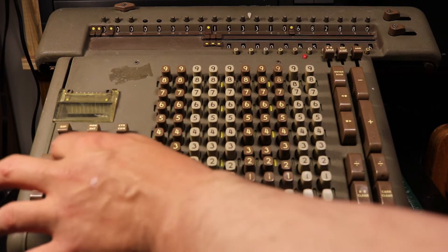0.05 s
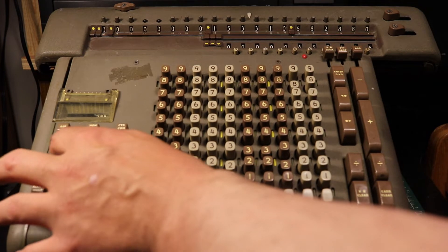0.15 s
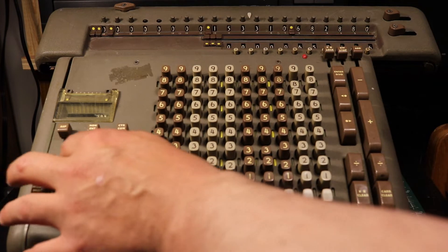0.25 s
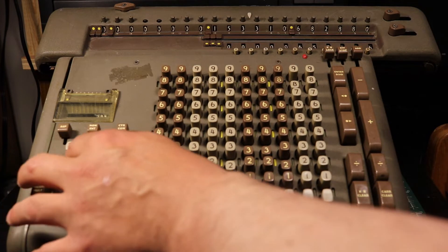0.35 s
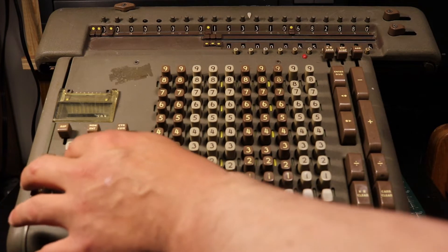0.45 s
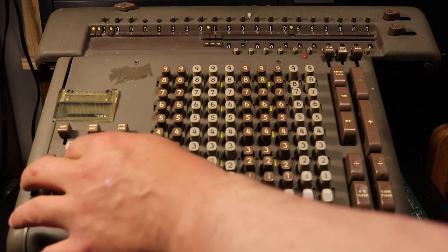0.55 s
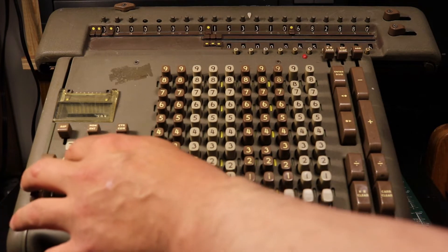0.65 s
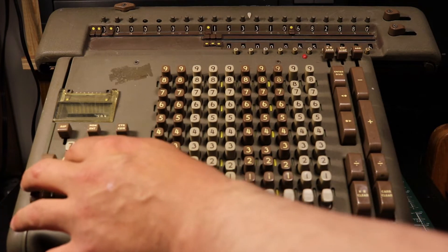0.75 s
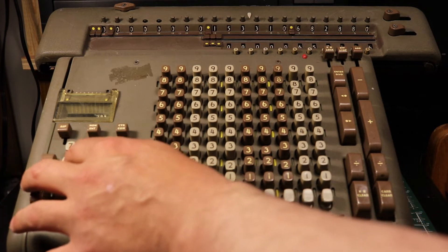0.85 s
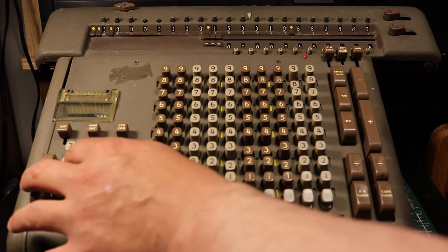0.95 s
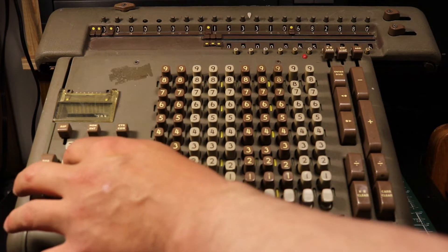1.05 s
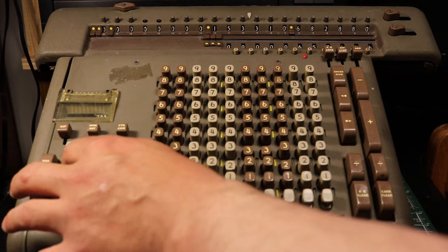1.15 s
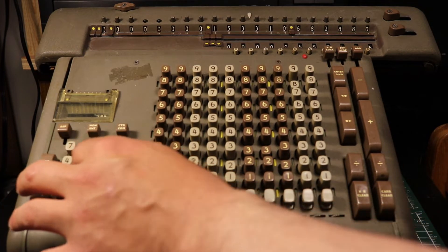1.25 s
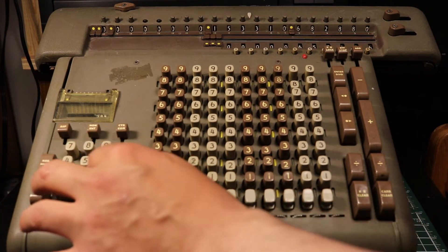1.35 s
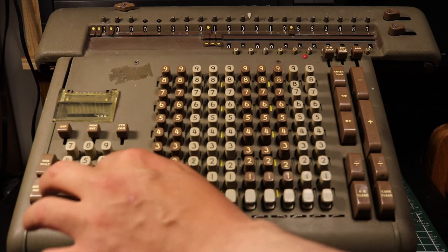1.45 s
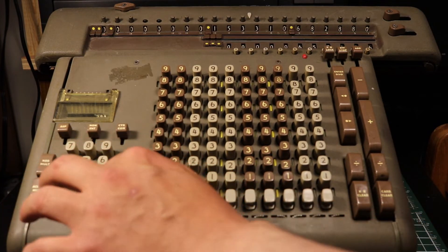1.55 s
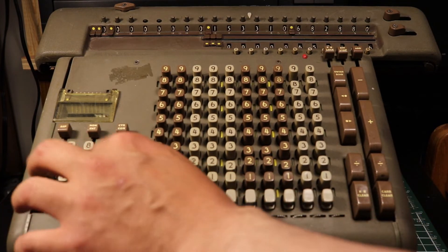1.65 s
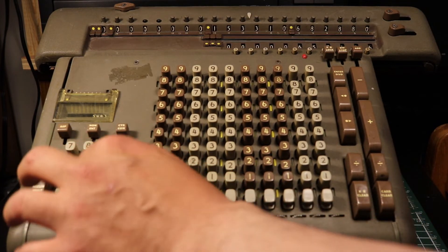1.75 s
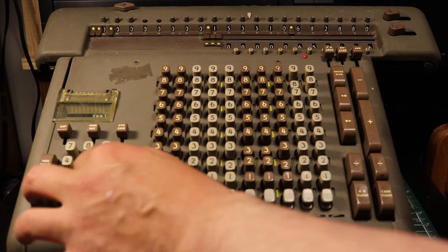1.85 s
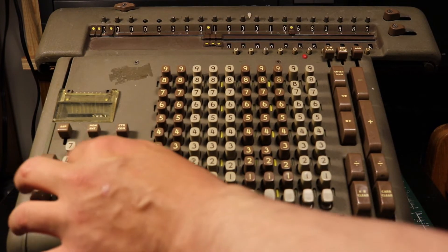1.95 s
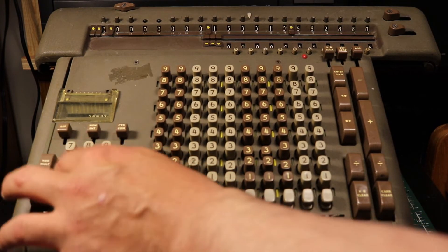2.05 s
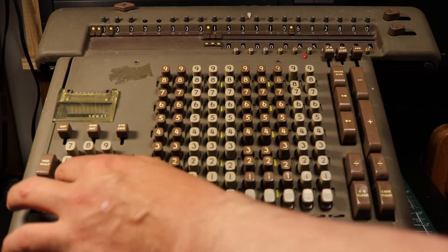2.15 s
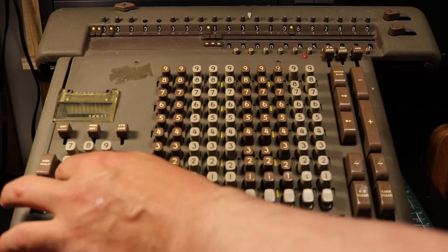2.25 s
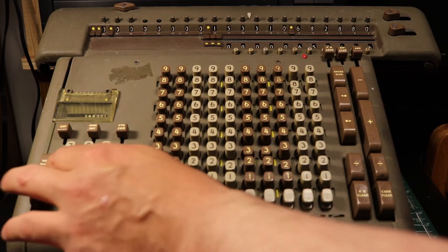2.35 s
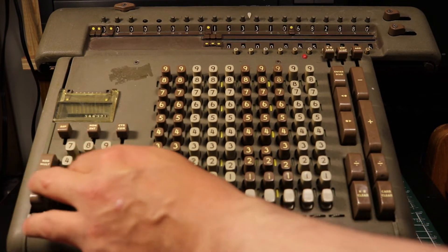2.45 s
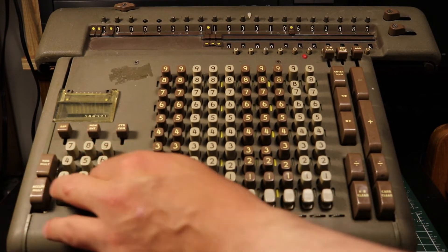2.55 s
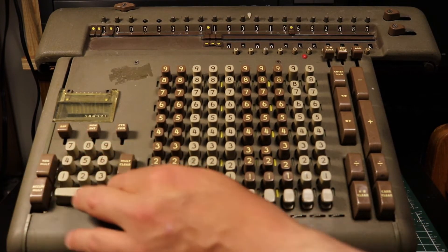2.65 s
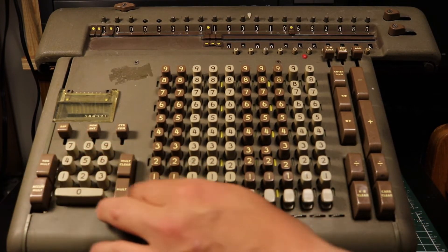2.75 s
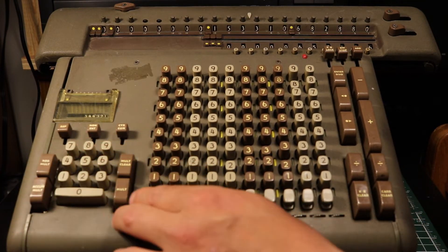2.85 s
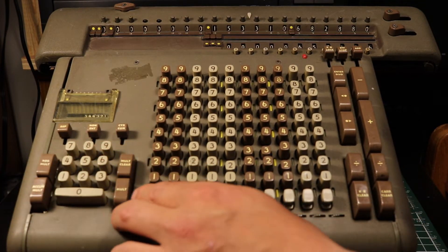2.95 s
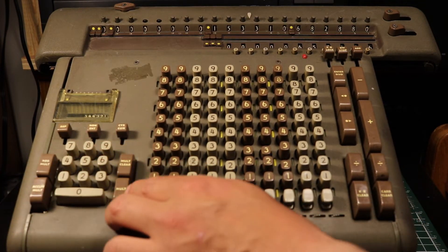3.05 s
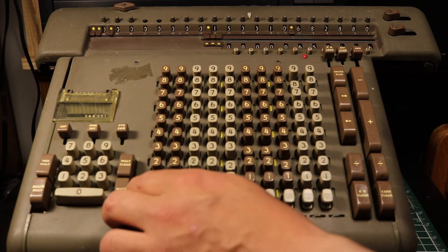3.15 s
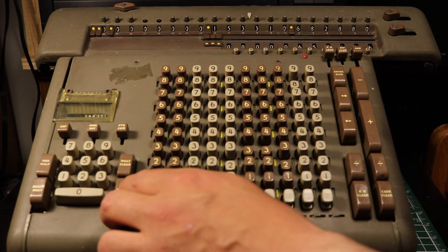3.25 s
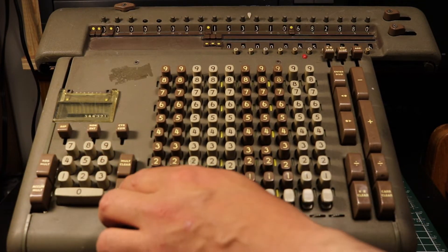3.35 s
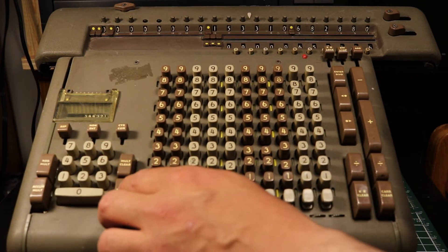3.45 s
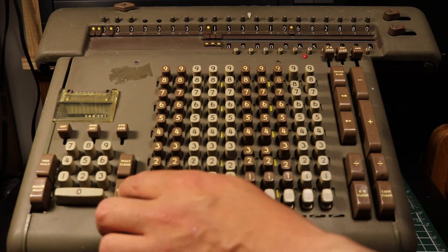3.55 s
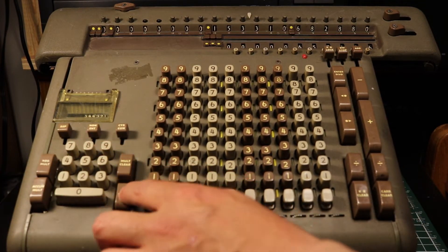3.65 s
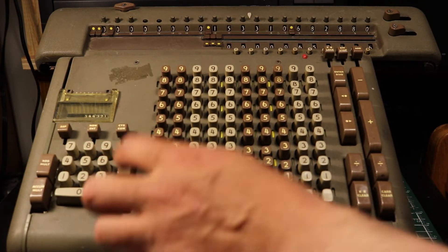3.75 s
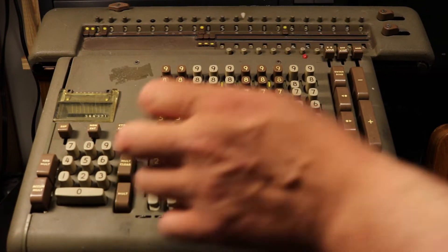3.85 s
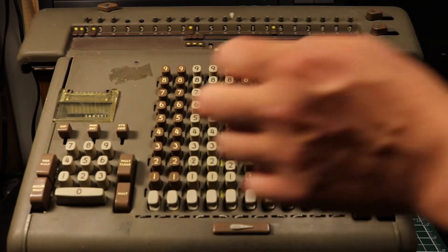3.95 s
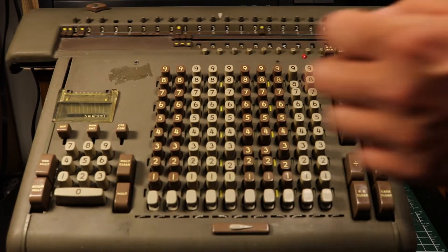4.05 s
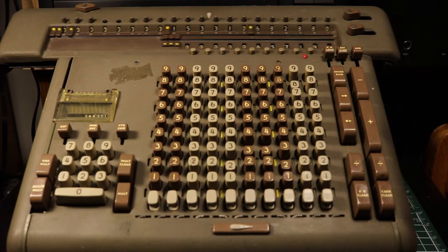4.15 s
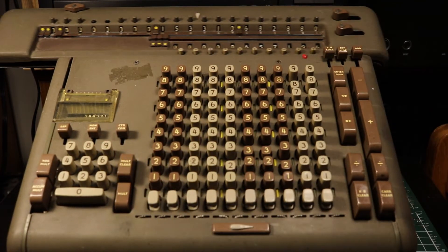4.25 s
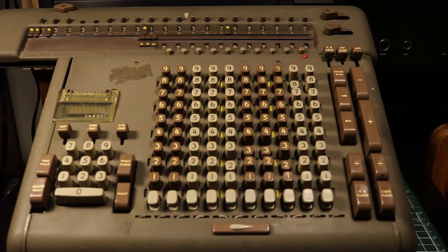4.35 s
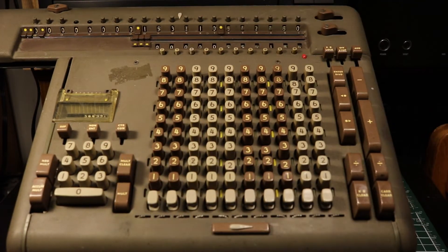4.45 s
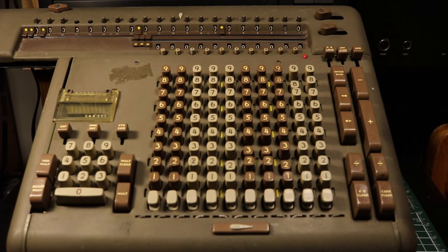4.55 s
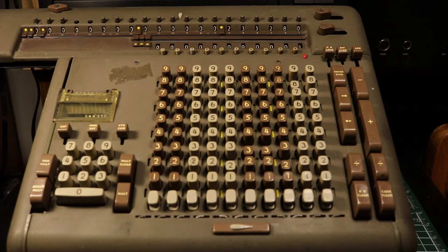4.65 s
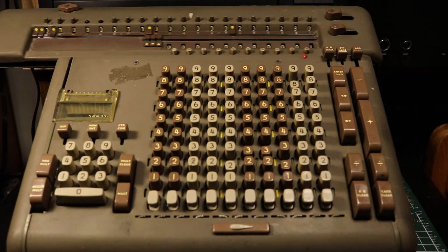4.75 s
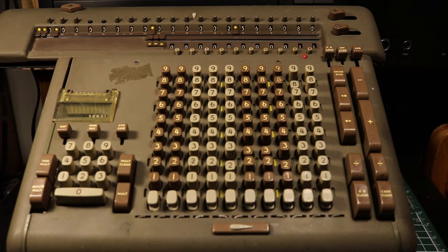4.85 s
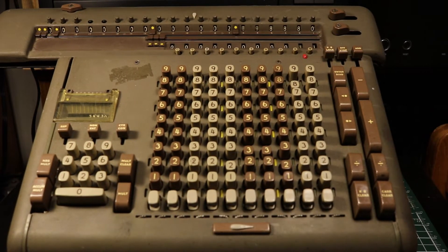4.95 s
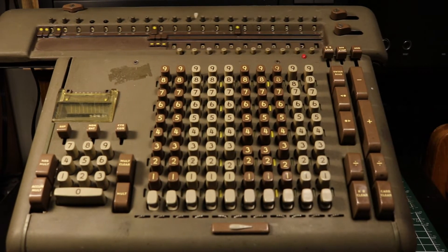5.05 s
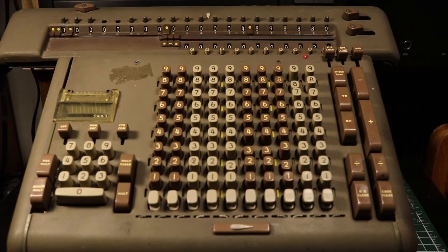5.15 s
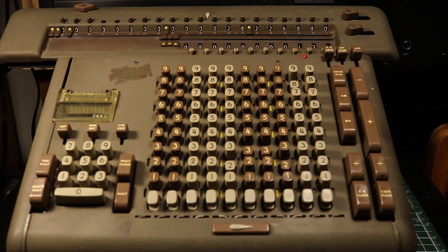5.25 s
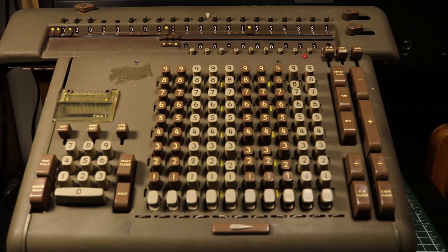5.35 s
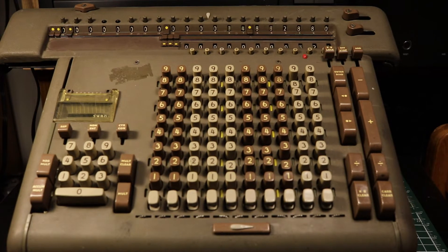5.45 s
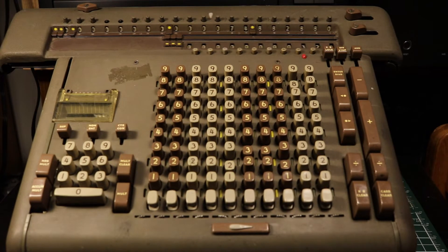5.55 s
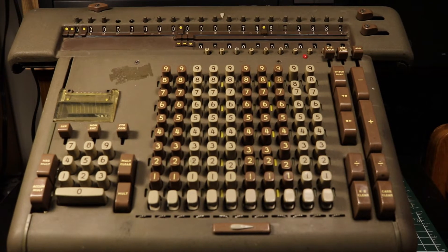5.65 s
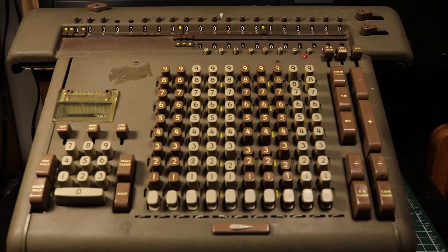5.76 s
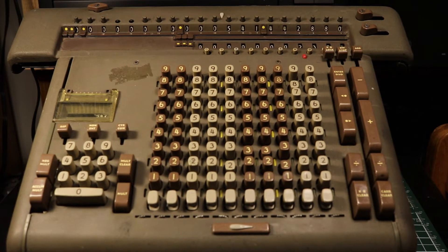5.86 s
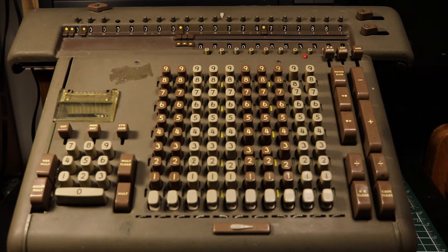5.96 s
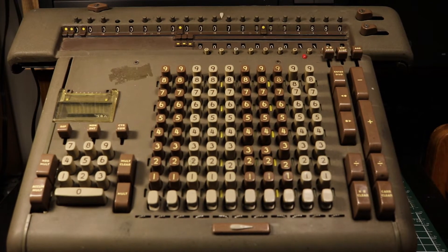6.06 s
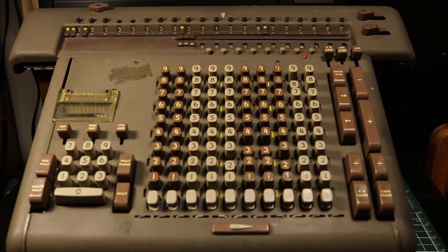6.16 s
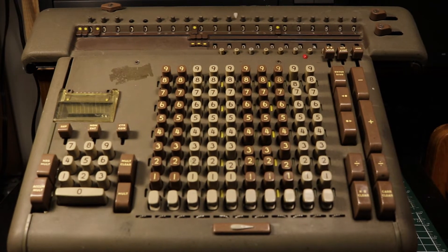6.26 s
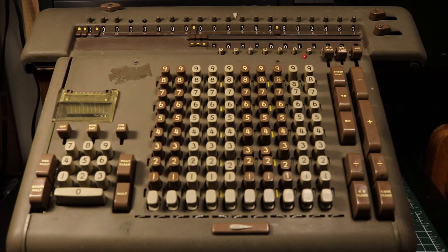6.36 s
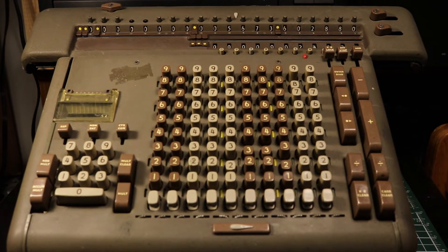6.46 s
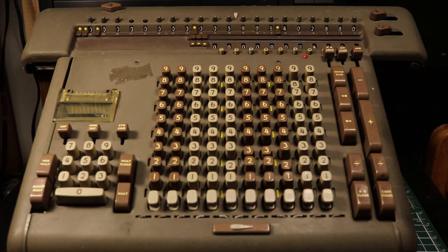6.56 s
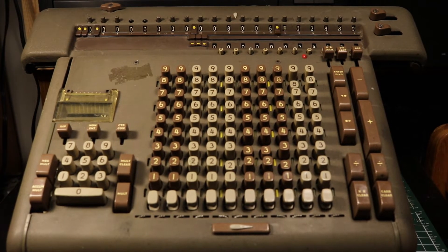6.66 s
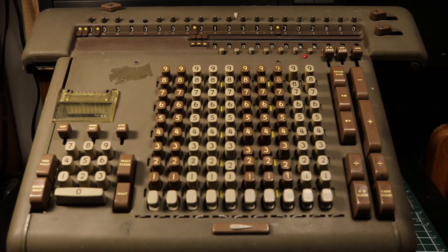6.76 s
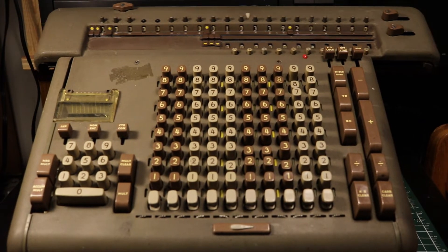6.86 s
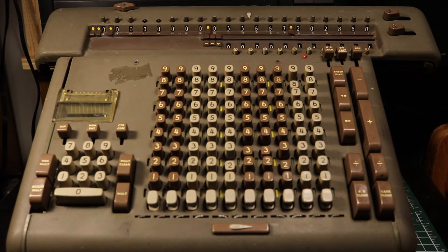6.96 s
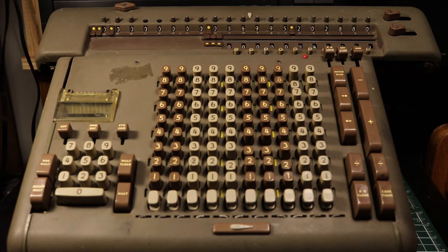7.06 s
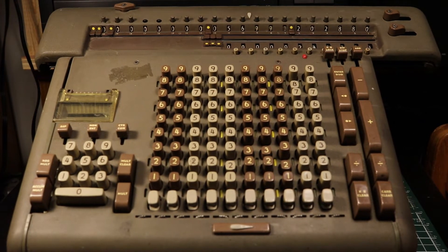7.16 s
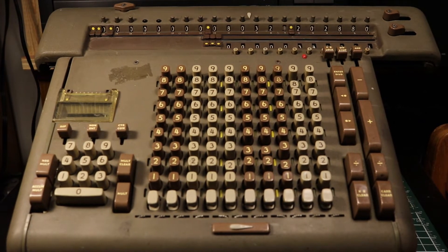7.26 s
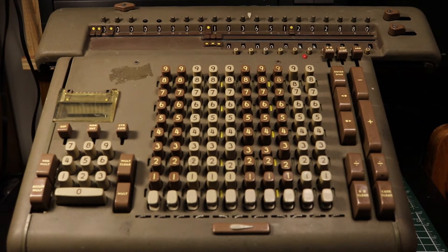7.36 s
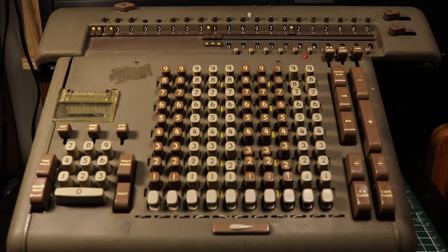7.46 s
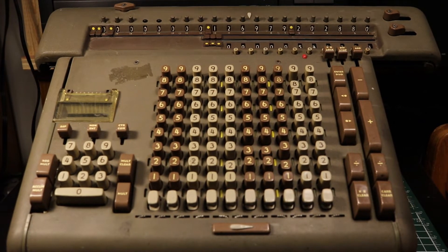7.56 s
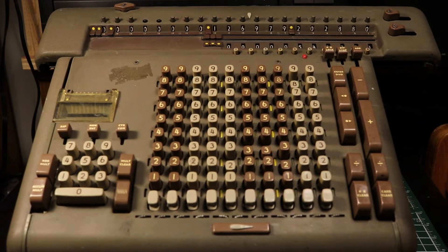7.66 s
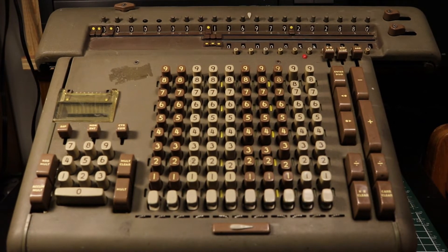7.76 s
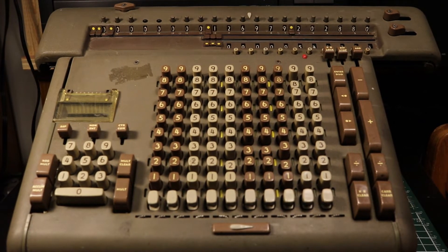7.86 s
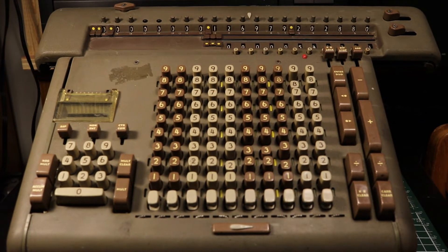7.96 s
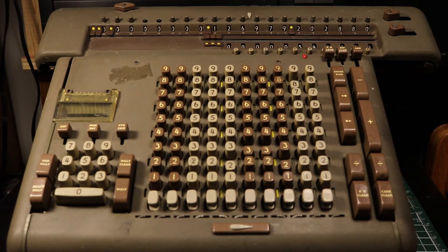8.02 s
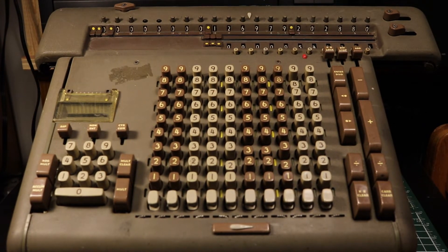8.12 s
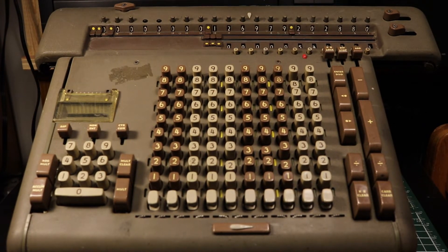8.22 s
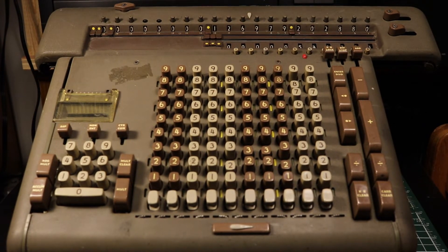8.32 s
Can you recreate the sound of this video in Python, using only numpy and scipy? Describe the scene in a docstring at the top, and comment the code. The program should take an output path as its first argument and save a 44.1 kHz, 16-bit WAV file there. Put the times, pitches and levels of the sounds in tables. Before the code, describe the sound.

A mechanical calculator's keys click and thud, then its motor runs a fast, even metallic clatter with heavier clanks before stopping.

```python
"""A motor-driven mechanical calculator on a desk in a small quiet room, heard from close by.
Four multiplier keys are pressed: each clicks going down, its latch snaps, a slide lands with a thud.
At 3.6 s the motor starts: the shaft turns eight times a second, tripping the same levers on every turn,
while carries and carriage shifts crash in between, ringing the steel parts and the sheet metal case.
Near 7.8 s the clutch drops out and the gears coast to rest, leaving still air and mains hum."""
import sys
import numpy as np
from scipy import signal
from scipy.fft import rfft, irfft
from scipy.io import wavfile

SR = 44100
rng = np.random.default_rng(int(sys.argv[2]) if len(sys.argv) > 2 else 0)


def dump_mix(stems):
    """Bounce the given channels to the path in sys.argv[1] as a 16-bit WAV at rate SR."""
    frames = np.atleast_2d(stems).T  # one column per channel
    limited = np.clip(frames, -1, 1)  # hard clip at full scale
    pcm = np.round(limited * 32767).astype(np.int16)
    wavfile.write(sys.argv[1], SR, pcm)


N = 369999
TIME = np.arange(N) / SR
MOTOR_START_S, CLUTCH_IN_S, CLUTCH_OUT_S = 3.60, 3.70, 7.775
FIRST_TURN_S, TURN_S = 3.641, .12315   # the main shaft

# how far the adding gears are engaged: t/s, load/0-1
LOAD = [(4.42, 0), (4.50, 0.71), (7.35, 0.69), (7.50, 0.15), (7.8, 0.65)]
# the carriage moves on one place: t/s, level offset/dB
SHIFTS = [(4.661, -0.5), (5.03, -0.5), (5.524, -1), (6.138, -1), (6.755, 0)]
# a digit is entered: t/s, latch snap length/s, snap level/dB, slide travel/s, thud level/dB
DIGITS = [(.0724, 0.006, -27, 0.019, -15.5), (1.6763, 0.0032, -21, 0.025, -16),
          (1.9973, .003, -21.5, .0186, -16.5), (2.325, 0.0049, -28.5, 0.015, -17.5)]


def cams(loose_db=0.5, jitter_s=.0006, shift_relief=0.45):
    """Every turn of the shaft trips the same levers, in a pattern set by the load: steel and case force."""
    # levers: position/turns, length/s, idling steel level/dB, adding steel level/dB, case level/dB
    levers = [(.037, .003, -44, -43.5, -32.5), (.183, .003, -28.5, -31.5, -27.5),
              (.24, .012, -48, -28.5, -30), (.35, .003, -57, -56, -34.5), (.42, .008, -34, -47, -34),
              (.485, .005, -35.5, -36, -31), (.57, .004, -40, -64, -30.5), (.64, .004, -37, -37, -40.5),
              (.755, .005, -42, -25, -29.5), (.79, .008, -33.5, -30, -29), (.86, .004, -34, -31.5, -29),
              (.905, .010, -34.5, -28.5, -28.5)]
    turns = int((CLUTCH_OUT_S - FIRST_TURN_S) / TURN_S) + 1
    position, length, idle_db, adding_db, case_db = np.tile(levers, (turns, 1)).T
    turn, lever = np.divmod(np.arange(len(position)), len(levers))
    s = FIRST_TURN_S + TURN_S * (turn + position) + rng.normal(0, jitter_s, len(position))
    shifting = sum((s > start) & (s < start + TURN_S) for start, _ in SHIFTS)
    load = in_time(LOAD, s) * (1 - shift_relief * shifting)   # a shift lifts part of the load for a turn
    chance_db = rng.normal(0, loose_db, len(s))
    steel_db = idle_db + load * (adding_db - idle_db) + chance_db
    on = (s > CLUTCH_IN_S) & (s < CLUTCH_OUT_S)
    rings = np.array(clinks(len(levers), ring_share=0.4))[lever[on]]
    steel = rattles(s[on], length[on], steel_db[on], per_s=2500, uneven_db=2.0, parts=rings)
    case = rattles(s[on], length[on], (case_db + chance_db)[on], per_s=2000, uneven_db=3.5)
    return harden(steel), case


def harden(force, edge_hz=10500, idle_db=-3.0):
    """Under load the contacts are harder, so their top is brighter."""
    soft = low_pass(force, edge_hz, order=1)
    return soft + (force - soft) * from_db(idle_db * (1 - in_time(LOAD)))


def strokes(case_boost_db=4.0):
    """Levers fall and the carriage jumps a place, each with its own clank: steel and case force."""
    s, length, steel_db, case_db = np.transpose(heavy_blows())
    clanks = clinks(len(s), ring_share=0.14, low_hz=1890, high_hz=3680, swell_s=0.0002)
    knocks = clinks(len(s), ring_share=0.093, low_hz=915, high_hz=1315, swell_s=0.0013)
    return (rattles(s, length, steel_db, per_s=3600, uneven_db=1.5, parts=clanks),
            rattles(s, length, case_db + case_boost_db, per_s=3500, uneven_db=4.0, parts=knocks))


def heavy_blows(pawl_step_s=.1328, carry_at_turn=.775):
    """Cue list of shifts, pawl falls, carries and crashes: t/s, length/s, steel level/dB, case level/dB."""
    # each shift lifts, lands and locks: delay/s, length/s, steel level/dB, case level/dB
    shift_blows = [(0, .012, -28, -23), (.107, .017, -26, -26), (.144, .016, -28.5, -27)]
    # a pawl starts counting off the turns of a digit: t/s
    countdowns = [5.184, 5.678, 6.415, 7.033]
    # clutch and register crash, mostly as the sum starts and ends: t/s, length/s, steel/dB, case/dB
    crashes = [(3.643, 0.0046, -36, -47), (3.655, .008, -24.5, -40), (3.73, 0.0062, -30.5, -33),
               (4.457, 0.032, -30, -30.5), (4.49, .036, -24, -28), (4.546, 0.021, -20.5, -25.5),
               (4.567, 0.034, -34, -39), (6.08, .034, -27.5, -29), (7.491, .011, -24.5, -27),
               (7.597, 0.036, -27.5, -26.5), (7.704, 0.0038, -16, -24), (7.70, 0.077, -31, -28.5),
               (7.749, 0.0084, -24, -25.5)]
    shifts = [(s + delay, length, db + steel_db, db + case_db)
              for s, db in SHIFTS for delay, length, steel_db, case_db in shift_blows]
    falls = [s + k * pawl_step_s for s in countdowns for k in range(3)]   # a little later in each turn
    pawls = [(s, .008, -29.5, -41) for s in falls]
    # carries ripple through the register late in each counted turn
    turn_starts = [s - (s - FIRST_TURN_S) % TURN_S for s in falls]
    carries = [(s + carry_at_turn * TURN_S, .03, -31.5, -35.5) for s in turn_starts]
    return shifts + pawls + carries + crashes


def keys(swell_s=0.00027, low_ring_hz=2000, top_hz=13500):
    """Keys click going down, then latch: force on the steel, ring of the struck part, force on the case."""
    s, length, steel_db, ring_db, ring_hz, case_db = np.transpose(key_contacts())
    steel = rattles(s, length, steel_db, per_s=12000, uneven_db=3.5, flatten=.55)
    pings = [ping(hz, swell_s * (1 + low_ring_hz / hz)) for hz in ring_hz]   # low rings last longer
    rings = rattles(s, length, ring_db, per_s=1000, uneven_db=13.5, parts=pings)
    case = rattles(s, length, case_db, per_s=4000, uneven_db=0.0, flatten=.5)
    return low_pass(steel, top_hz), rings, case


def key_contacts(touch_hz=790, slip_hz=9150, latch_hz=3110, slip_s=.0065, landing_lead_s=.0016):
    """Cue list of the keyboard: t/s, length/s, steel level/dB, ring level/dB, ring f/Hz, case level/dB."""
    # keys click in their guides: t/s, length/s, level/dB, ring relative to the click/dB, ring f/Hz
    clicks = [(.010, 0.0069, -46.5, -18, 3300), (0.042, 0.0021, -50, -2, 3500),
              (0.29, .0028, -60, -2, 8370), (1.2225, 0.0023, -56, 1, 13500),
              (1.349, 0.0035, -56.5, 1, 7600), (1.5384, 0.0039, -32, -5, 7400),
              (1.591, .006, -49.5, -9, 8500), (1.788, 0.0062, -44.5, -9, 8400),
              (1.832, .0039, -55, -10, 8400), (1.87, 0.0043, -29, -15, 7860),
              (2.0835, 0.0049, -40.5, 2, 9000), (2.1721, .0018, -21.5, 6, 2980),
              (2.282, 0.0016, -45.5, -4, 8700), (2.653, 0.0018, -62, 6, 8740),
              (2.857, 0.0029, -55, -3.5, 1950), (3.029, 0.0061, -54, -2, 8500),
              (3.286, 0.0069, -56, -7.5, 5970), (3.626, .0027, -43, -7, 3300)]
    # fingers touch the key tops with a hollow tap: t/s, level/dB
    touches = [(1.417, -59.5), (1.79, -56), (1.834, -52.5), (1.978, -52), (2.109, -52.5), (2.301, -52),
               (3.03, -62), (3.59, -59)]
    cues = [(s, length, db, db + ring_db, hz, db - 9.5) for s, length, db, ring_db, hz in clicks]
    cues += [(s, 0.0083, db - 4, db, touch_hz, db - 4) for s, db in touches]
    for s, length, db, travel_s, _ in DIGITS:
        # the latch slips along its edge and snaps, then the slide clatters as it lands
        slip = (s - slip_s, slip_s, db - 13, db - 10, slip_hz, db - 23)
        snap = (s, length, db, db - 5, latch_hz, db - 13)
        landing = (s + travel_s - landing_lead_s, .0035, -36, -36, latch_hz, -32.5)
        cues += [slip, snap, landing]
    return cues


def slide(contact_s=0.0012):
    """The heavy slide lands with one soft push that sets the frame ringing."""
    # modes of the heavy frame: f/Hz, relative level/dB, t60/s
    frame_modes = [(118, -22.5, 0.09), (143, -3.5, 0.15), (185, -5, 0.19), (228, 3, 0.11), (283, 2, .13),
                   (344, -10.5, 0.15), (375, -24, 0.123), (474, -12, .07), (603, -19, 0.22),
                   (776, -5, 0.085), (1090, -10.5, 0.049)]
    force, push = np.zeros(N), np.hanning(int(contact_s * SR))
    for s, _, _, travel_s, db in DIGITS:
        first = int((s + travel_s) * SR)
        force[first:first + len(push)] += from_db(db) * push / push.sum()
    t = TIME[:SR // 2]
    frame = sum(from_db(db - 60 * t / t60) * np.cos(2 * np.pi * hz * t) for hz, db, t60 in frame_modes)
    return through(force, frame / frame[0])


def rattles(starts, lengths, levels_db, per_s, uneven_db, parts=None, flatten=0):
    """Parts strike and bounce: a first contact, then random ones, hardest near the middle; rms levels."""
    force = np.zeros(N)
    for k, (s, length, db) in enumerate(zip(starts, lengths, levels_db)):
        span, first = max(int(length * SR), 2), int(s * SR)
        burst_rng = np.random.default_rng(rng.integers(1 << 30))
        when, strength, side = burst_rng.random((1 + int(per_s * length), 3)).T
        when[0] = 0
        arch = 1.1 + np.sin(np.pi * when)
        sizes = from_db(uneven_db * (2 * strength - 1)) * np.sign(side - .5) * arch
        burst = np.bincount((when * span).astype(int), sizes, minlength=span)
        if flatten:
            burst = evened(np.pad(burst, (0, span)), flatten)
        if parts is not None:
            burst = np.convolve(burst, parts[k])
        force[first:first + len(burst)] += from_db(db) * np.sqrt(span) * unit_energy(burst)
    return force


def evened(burst, share):
    """Level out a share of the peaks and dips in a burst's spectrum, so that it snaps without a pitch."""
    spectrum = rfft(burst)
    return irfft(spectrum / (np.abs(spectrum) + 1e-9) ** share, len(burst))


def clinks(count, ring_share, low_hz=6500, high_hz=10000, swell_s=0.00039):
    """Every lever adds a brief ring of its own pitch to the bare contact."""
    bare = signal.unit_impulse(512)
    pitches = rng.uniform(low_hz, high_hz, count)
    return [bare + ring_share * unit_energy(ping(hz, swell_s)) for hz in pitches]


def ping(hz, swell_s):
    """The ring of a small part: it swells and dies within milliseconds."""
    t = TIME[:512]
    return t * np.exp(-t / swell_s) * np.sin(2 * np.pi * hz * t)


def steel_parts():
    """The bright ring of the small steel parts, as an impulse response."""
    # broad tone: f/Hz, level/dB
    tone = [(300, -33), (1200, -30.5), (2100, -5.5), (3100, -2.5), (4200, -4), (5300, -7.5), (6500, -3),
            (7800, -1), (9400, -1.5), (11200, -9.5), (13800, -4.5), (15500, -7.5), (17000, -9)]
    # resonances: f/Hz, width/Hz, boost/dB
    modes = [(3080, 130, 2), (8850, 340, 3), (13740, 100, 0.5)]
    return body(tone, modes)


def metal_case():
    """The boxy knock of the sheet metal case, as an impulse response."""
    # broad tone: f/Hz, level/dB
    tone = [(40, -39), (85, -16.5), (125, -10), (200, -3), (330, -2.5), (480, -4.5), (620, -8), (920, -11),
            (1150, -7), (1450, -8.5), (2300, -16), (3500, -16), (5500, -36.5), (16000, -58.5)]
    # panel resonances: f/Hz, width/Hz, boost/dB
    modes = [(138, 19, 4.5), (167, 9.8, 6.5), (197, 15.3, 9), (233, 14, 4.5), (262, 19, 6.5), (294, 16, 3),
             (322, 16.7, 8), (343, 9, 5), (358.4, 11, 5), (389, 9.9, 8.5), (439, 13, 4.5), (524, 25, 5),
             (615, 13, 6.5), (729, 50, 5), (794, 60, 6), (1050, 65, 6.5), (1142, 61, 6), (1264, 36, 6),
             (1627, 115, 3.5), (1930, 54, 4), (2163, 85, 6.5)]
    return body(tone, modes)


def body(tone, modes, size=16384):
    """Impulse response of a part: a broad spectrum with resonances standing on it."""
    hz = np.arange(size // 2 + 1) * SR / size
    peaks = sum((from_db(db) ** 2 - 1) / (1 + (2 * (hz - f) / width) ** 2) for f, width, db in modes)
    gain = from_db(at_hz(tone, hz)) * np.sqrt(1 + peaks)
    cepstrum = irfft(np.log(gain))
    cepstrum[1:size // 2] *= 2   # minimum phase: nothing sounds before the blow
    cepstrum[size // 2 + 1:] = 0
    return unit_energy(irfft(np.exp(rfft(cepstrum))))


def gears(coast_s=0.084, chatter_hz=13000, whirr_hz=5000, rumble_hz=1700):
    """Meshing teeth chatter and shake the case; coasting, they thin out to a soft, uneven whirr."""
    load = in_time(LOAD)
    rumble_db = -30 + 3 * load + drive_db(drop_db=11.5, fade_db_per_s=48.5)
    chatter_db = -42 + 4.5 * load + drive_db(drop_db=9.0, fade_db_per_s=48.5)
    drive = np.exp(-np.maximum(TIME - CLUTCH_OUT_S, 0) / coast_s)
    backlash = from_db(3.0 * wander(hz=45))
    whirr = rms_one(backlash * low_pass(teeth(per_s=1200, uneven_db=5.0), whirr_hz))
    driven = rms_one(low_pass(teeth(per_s=3500, uneven_db=3), chatter_hz))
    chatter = from_db(chatter_db) * (drive * driven + (1 - drive) * whirr)
    rumble = from_db(rumble_db) * low_pass(teeth(per_s=1500, uneven_db=2.5), rumble_hz, order=1)
    return chatter, rumble


def teeth(per_s, uneven_db):
    """Gear teeth touch in an endless stream of small random contacts; rms 1."""
    sizes = from_db(uneven_db * np.clip(rng.standard_normal(N), -2, 2)) * rng.choice([-1, 1], N)
    return rms_one(sizes * (rng.random(N) < per_s / SR))


def drive_db(drop_db, fade_db_per_s, run_up_db=41, run_up_s=0.059, lag_s=0.019, release_s=.03):
    """Level of a driven part: it runs up, holds, drops when the clutch lets go, and fades as it coasts."""
    run_up = np.clip((TIME - MOTOR_START_S) / run_up_s, 0, 1)
    coasting_s = np.maximum(TIME - CLUTCH_OUT_S - lag_s, 0)
    released = np.minimum(coasting_s / release_s, 1)
    return run_up_db * (run_up - 1) - drop_db * released - fade_db_per_s * coasting_s


def motor(rotor_hz=28.8, whine_hz=345):
    """The rotor rocks the machine once per revolution, a little unevenly; a faint whine runs with the drive and
    fades as it coasts."""
    # how hard the machine rocks: t/s, level/dB
    rocking_levels = [(3.6, -77), (3.69, -67), (5.35, -46.5), (5.69, -57), (5.79, -56), (7.25, -54),
                      (8.3, -67)]
    sway, flutter = 0.89 * wander(hz=3.6), 0.58 * wander(hz=3.6)   # phase drift in radians
    rocking_gain = from_db(in_time(rocking_levels)) * (TIME > MOTOR_START_S)
    rocking = rocking_gain * np.sin(2 * np.pi * rotor_hz * TIME + sway)
    whine_gain = from_db(-48 + drive_db(drop_db=7, fade_db_per_s=21.5))
    whine = whine_gain * np.sin(2 * np.pi * whine_hz * TIME + flutter)
    return np.sqrt(2) * (rocking + whine)


def room(x, wet_db, near_db, near_t60=0.093, build_s=0.0043, size=20000):
    """Desk and near walls answer within milliseconds; the room's tail follows, longest in the bass."""
    # decay of the tail by band: f/Hz, t60/s
    decays = [(200, 0.59), (550, 0.27), (1400, 0.2739), (3500, 0.32), (9000, 0.2), (15000, 0.25)]
    t, hz = TIME[:size], np.arange(size // 2 + 1) * SR / size
    centres, t60s = np.transpose(decays)
    white, tail = rfft(rng.standard_normal(size)), 0
    for share, t60 in zip(np.eye(len(centres)), t60s):
        band = irfft(white * at_hz(np.column_stack([centres, share]), hz))
        tail = tail + band * from_db(-60 * t / t60)
    near = rng.standard_normal(size) * from_db(-60 * t / near_t60)
    swell = 1 - np.exp(-(t / build_s) ** 2)
    echoes = from_db(wet_db) * unit_energy(tail * swell) + from_db(near_db) * unit_energy(near * swell)
    return x + through(x, echoes)


def room_tone(air_db=-63.5, hum_db=-59, hum_hz=60):
    """Still room air and mains hum."""
    # colour of the air: f/Hz, relative level/dB
    air_tone = [(20, -2), (40, 12), (90, -3), (150, -1.5), (300, -10), (600, -11.5), (1500, -17.5),
                (4000, -21.5), (10000, -26), (16000, -27)]
    noise = rfft(rng.standard_normal(N))
    hz = np.arange(len(noise)) * SR / N
    air = rms_one(irfft(noise * from_db(at_hz(air_tone, hz)), N))
    hum = np.sqrt(2) * np.sin(2 * np.pi * hum_hz * TIME)
    return from_db(air_db) * air + from_db(hum_db) * hum


def from_db(db):
    return 10 ** (np.asarray(db) / 20)


def unit_energy(x):
    return x / np.sqrt(np.sum(x ** 2) + 1e-20)


def rms_one(x):
    return unit_energy(x) * np.sqrt(len(x))


def in_time(curve, t=TIME):
    """A breakpoint curve read at the times t."""
    return np.interp(t, *np.transpose(curve))


def at_hz(points, hz):
    """A spectrum read on a log-frequency axis."""
    f, value = np.transpose(points)
    return np.interp(np.log(np.maximum(hz, 1)), np.log(f), value)


def through(x, response):
    return signal.fftconvolve(x, response)[:N]


def low_pass(x, hz, order=2):
    return signal.sosfilt(signal.butter(order, hz, fs=SR, output="sos"), x)


def wander(hz):
    """Random drift, mostly slower than hz; rms 1."""
    return rms_one(low_pass(rng.standard_normal(N), hz))


def scene():
    """Keys and drive ring the same steel parts and case; each mechanism has its own echoes."""
    steel, case = steel_parts(), metal_case()
    key_steel, key_rings, key_case = keys()
    keyboard = (room(through(key_steel, steel), wet_db=-9.5, near_db=-12.0)
                + room(key_rings, wet_db=-28.0, near_db=-8.0)
                + room(through(key_case, case), wet_db=-5.0, near_db=-4.0)
                + room(slide(), wet_db=-18.0, near_db=-8.0))
    running = sum(room(through(on_steel, steel), wet_db=-8.5, near_db=-11.5)
                  + room(through(on_case, case), wet_db=-12.0, near_db=-13.5)
                  for on_steel, on_case in [cams(), strokes(), gears()])
    return (keyboard + from_db(-0.9) * running + motor() + room_tone())[None]


def record(dry, cutoff_hz=15900):
    """The top is cut steeply."""
    return signal.sosfilt(signal.ellip(12, .1, 80, cutoff_hz, fs=SR, output="sos"), dry)


dry = scene()
out = record(dry)
dump_mix(out)
```